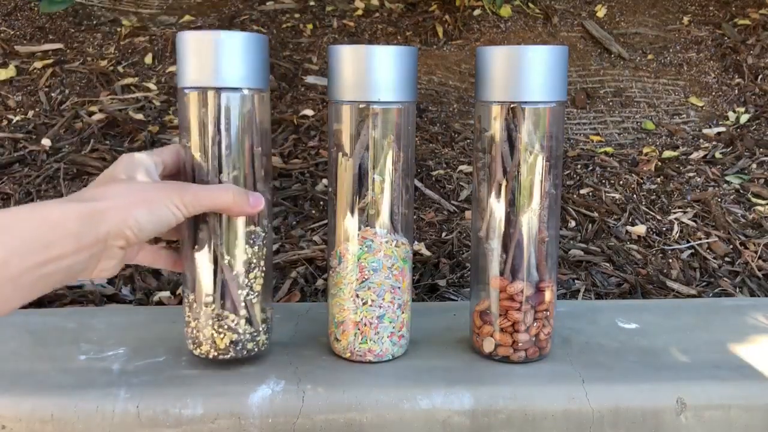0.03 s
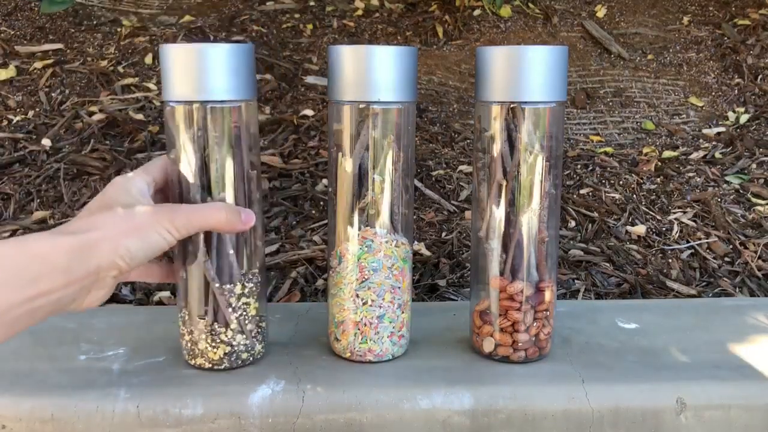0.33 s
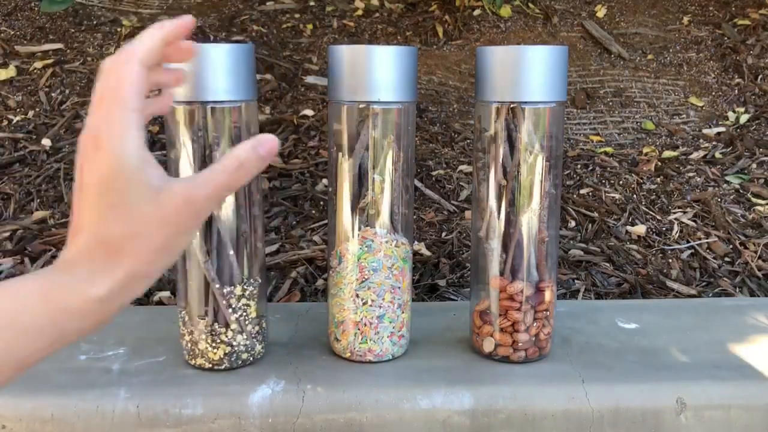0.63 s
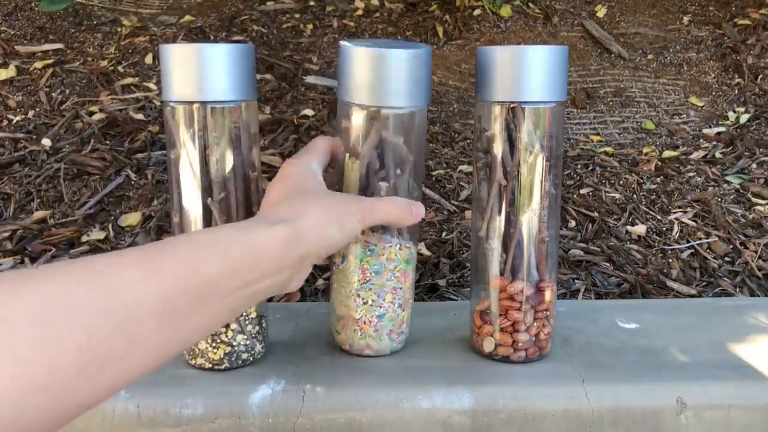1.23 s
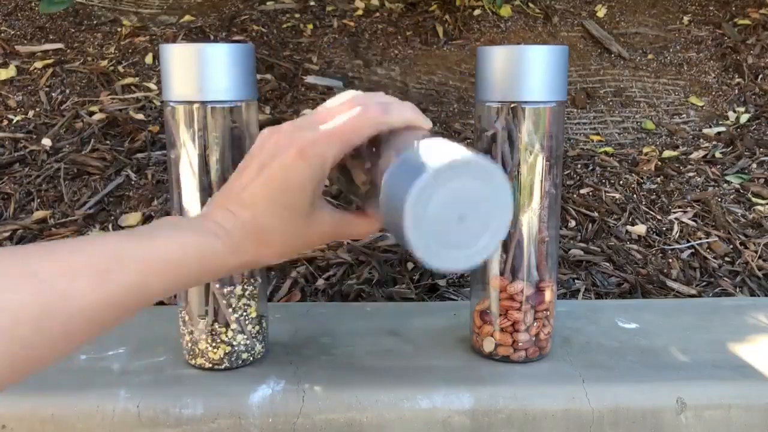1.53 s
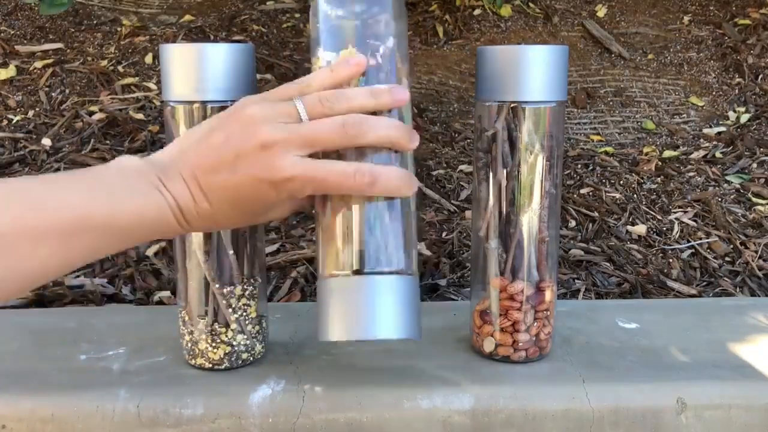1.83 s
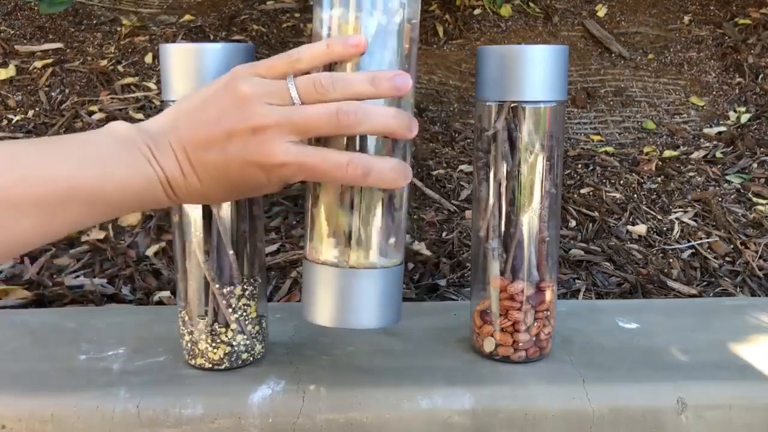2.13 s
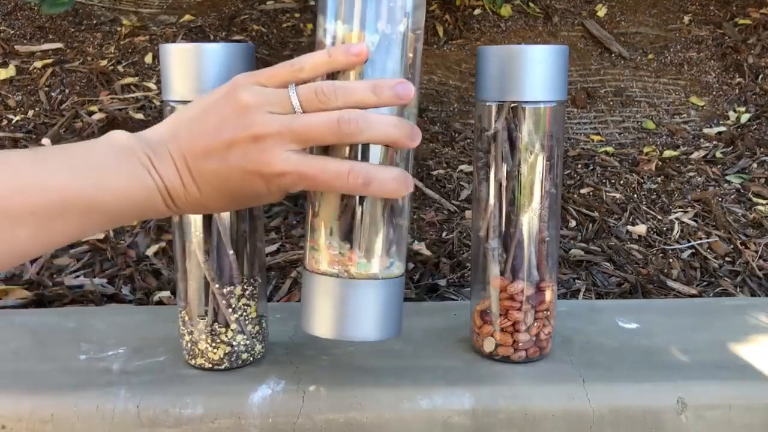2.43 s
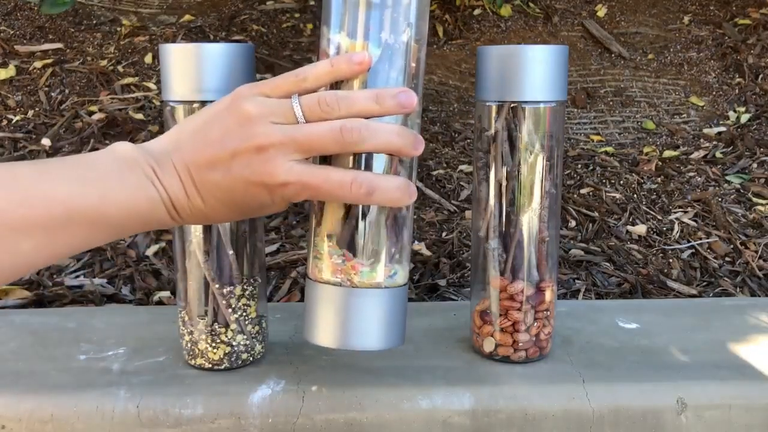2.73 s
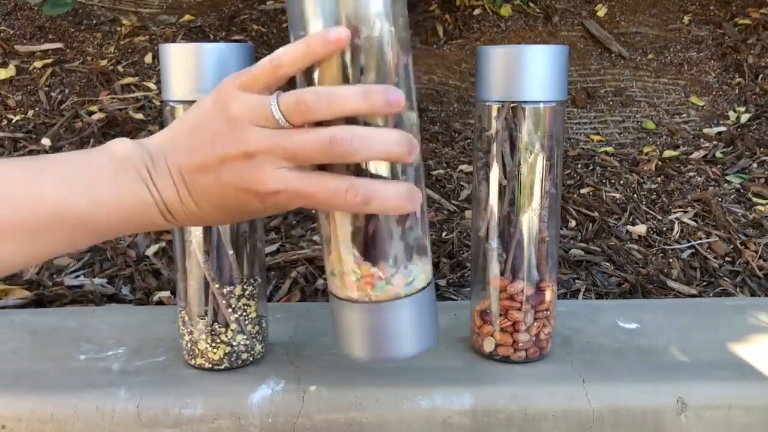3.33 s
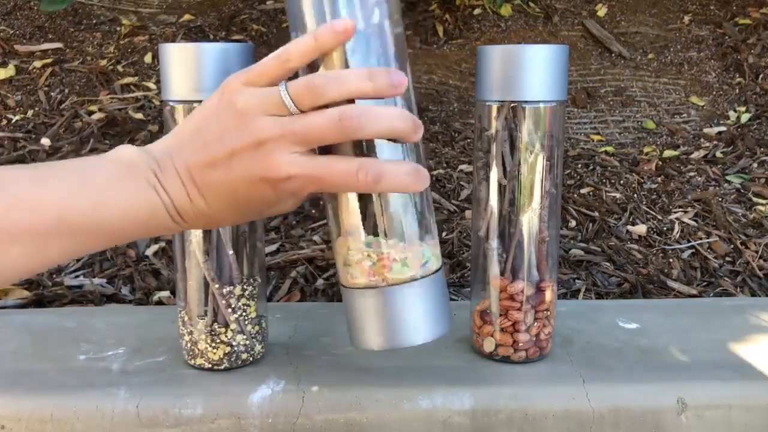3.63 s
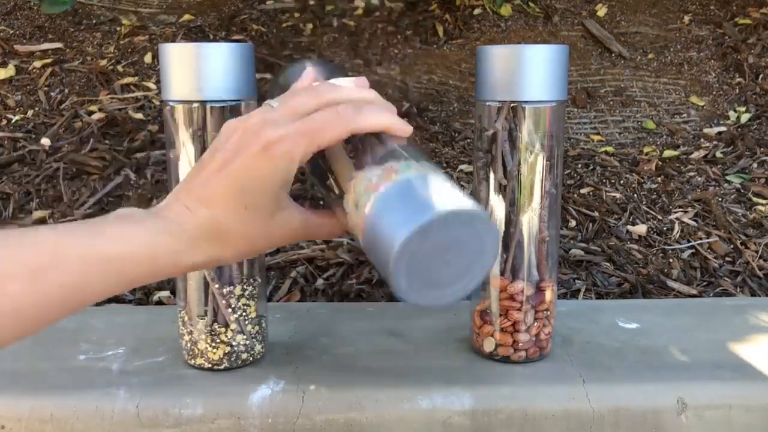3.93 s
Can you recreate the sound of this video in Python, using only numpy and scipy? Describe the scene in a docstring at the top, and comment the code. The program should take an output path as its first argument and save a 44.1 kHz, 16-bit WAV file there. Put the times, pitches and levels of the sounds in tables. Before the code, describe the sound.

Small grains pour and hiss like rain inside a plastic bottle being turned over.

```python
"""Seeds and grains in plastic bottles

Outdoors, a bottle of seeds is set on a bench: the knock excites its modes and the seeds settle.
A second bottle is picked up and turned over: hard grains slip in clumps, slide down the wall, pelt
the cap and trickle out; a tilt pours the rest. Each impact rings short, damped modes of the plastic.
Dull handling bumps and a light wind rumble lie underneath, with a faint far bird."""
import sys
import numpy as np
from scipy import signal
from scipy.io import wavfile

SR = 44100
rng = np.random.default_rng(int(sys.argv[2]) if len(sys.argv) > 2 else 0)


def dump_mix(stems):
    """Bounce the given channels to the path in sys.argv[1] as a 16-bit WAV at rate SR."""
    frames = np.atleast_2d(stems).T  # one column per channel
    limited = np.clip(frames, -1, 1)  # hard clip at full scale
    pcm = np.round(limited * 32767).astype(np.int16)
    wavfile.write(sys.argv[1], SR, pcm)


N = 176400
TIME = np.arange(N) / SR
CLUMP_GRAINS_PER_S = 8000

# spectra of seed impacts, hard hits on the wall and hits on the cap: frequency_hz, gain_db
SEED_SPECTRUM = [(1000, 5.5), (2000, -2.5), (2700, 3), (4000, 4.5), (7000, 5.5), (9200, 7), (11500, 0),
                 (15500, -7)]
HARD_HIT_SPECTRUM = [(1200, -28), (2500, -0.5), (4500, 5), (6500, 7), (8200, 9.5), (10300, 14), (12000, -3),
                     (15500, -3)]
CAP_SPECTRUM = [(1200, -33), (2600, -10.5), (4800, -39), (5700, -5), (6800, -1), (7500, -0.5), (8350, -2),
                (8900, -2), (11000, -6.5), (13200, -12), (15500, -4)]


def from_db(db):
    """Decibels to amplitude ratio."""
    return 10 ** (np.asarray(db) / 20)


def level(rows):
    """Amplitude envelope through (time_s, level_db) points, silent outside them."""
    return from_db(np.interp(TIME, *np.transpose(rows), left=-140, right=-140))


def gain_at(spectrum, hz):
    """Amplitude gain of a spectrum, interpolated in decibels over log frequency."""
    frequencies, db = np.transpose(spectrum)
    return from_db(np.interp(np.log(hz), np.log(frequencies), db))


def bursts(rows, attack_s):
    """Transient envelopes: a linear rise, then exponential decay."""
    out, age = np.zeros(N + SR), TIME[:SR // 4]
    for start_s, db, decay_s in rows:
        start = int(start_s * SR)
        rise = np.minimum(age / attack_s, 1)
        fall = np.exp(-np.clip(age - attack_s, 0, 20 * decay_s) / decay_s)
        out[start:start + len(age)] += from_db(db) * rise * fall
    return out[:N]


def ring(force, hz, t60_s):
    """Damped resonator: a unit impulse starts a sinusoid of amplitude about 1."""
    radius, angle = from_db(-60 / (t60_s * SR)), 2 * np.pi * hz / SR
    return signal.lfilter([.5, 0, -.5], [1, -2 * radius * np.cos(angle), radius ** 2], force + 1e-18)


def reverberation(sound, t60_s):
    """Diffuse reflections: convolution with decaying noise of unit energy."""
    age = TIME[:SR // 2]
    response = rng.standard_normal(len(age)) * from_db(-60 * age / t60_s)
    return signal.fftconvolve(sound, response / np.linalg.norm(response))[:N]


def shaped_noise(spectrum, envelope):
    """Spectral shaping: noise weighted in half-octave bands, its rms following the envelope."""
    edges_hz = 20 * 2 ** np.arange(0, 10.1, .5)
    white = rng.standard_normal((2, N)) * envelope + 1e-18
    out, power = 0, 0
    for k, (low, high) in enumerate(zip(edges_hz, edges_hz[1:])):
        gain = gain_at(spectrum, np.sqrt(low * high))
        band = signal.butter(2, [low, high], "band", fs=SR, output="sos")
        out = out + gain * signal.sosfilt(band, white[k % 2])
        power += gain ** 2 * (high - low) * 2 / SR
    return out / np.sqrt(power)


def impacts(envelope, per_s, spectrum, size_spread_db=2.5, t60_s=.008):
    """Shot noise: grains strike at random, each exciting the wall's modes with its own strengths."""
    chance = np.clip(per_s / SR, 1e-6, .9) * np.ones(N)
    sizes = rms_one(from_db(size_spread_db * np.minimum(rng.exponential(1, N), 4.5)))
    hits = np.flatnonzero((rng.random(N) < chance) & (envelope > 1e-6))
    force = (sizes * envelope / np.sqrt(chance))[hits]
    modes_hz = np.linspace(1000, 15800, 48)
    gains = gain_at(spectrum, modes_hz)
    couplings = rng.standard_normal((len(modes_hz), 4093))
    out, clicks = np.zeros((2, N))
    active = slice(hits[0], hits[-1] + SR // 20)
    for hz, gain, coupling in zip(modes_hz, gains / np.linalg.norm(gains), couplings):
        clicks[hits] = gain * force * coupling[hits % len(coupling)]
        out[active] += ring(clicks[active], hz, t60_s)
    return out * np.sqrt(4 * np.log(1000) / (t60_s * SR))  # rms follows the envelope


def rms_one(x):
    """Normalisation to unit rms."""
    return x / np.sqrt(np.mean(x ** 2) + 1e-20)


def stream(flow, spectrum):
    """Granular flow: the impact rate grows as a power of the flow's amplitude."""
    envelope = level(flow)
    per_s = 5000 * (envelope / from_db(-39)) ** .45
    return impacts(envelope, per_s, spectrum)


def wind():
    """Turbulence gives a slowly varying rumble over the steady noise of the open air."""
    # strength of the rumble: time_s, level_db
    gusts = [(0, -46), (.6, -48.5), (.95, -47.5), (1.35, -40), (1.48, -47.5), (2.1, -45), (2.35, -44.5),
             (2.75, -48.5), (3.3, -44.5), (4, -47)]
    # spectra of the rumble and the air: frequency_hz, gain_db
    rumble_spectrum = [(22, -30), (45, -3.5), (70, 2), (120, -0.5), (230, -6.5), (400, -21), (700, -49),
                       (1500, -65)]
    air_spectrum = [(100, 10.5), (400, -16.5), (650, -0.5), (900, -0.5), (1300, -9), (2000, -17.5),
                    (4000, -21.5), (6000, -28), (10000, -32.5), (15000, -40)]
    return shaped_noise(rumble_spectrum, level(gusts)) + shaped_noise(air_spectrum, from_db(-56.5))


def settling_seeds():
    """Random collisions rattle as the seeds shift in the first bottle."""
    # motion of the seeds: time_s, level_db
    shifting = [(0, -52), (.02, -54.5), (.09, -55.5), (.16, -67), (.285, -81), (.297, -47.5), (.35, -55),
                (.43, -56), (.47, -56.5), (.55, -56), (.66, -66), (.74, -63), (.8, -85)]
    return impacts(level(shifting), 1400, SEED_SPECTRUM)


def handling(end_hz=99, sink_s=.0043, attack_s=.0035, decay_s=.009):
    """Soft impacts thud with sinking pitch; friction of skin and bench adds bursts of noise."""
    # bumps of the hand: start_s, peak_db, start_hz
    bumps = [(.082, -32, 323), (.12, -32.5, 258), (0.188, -32, 340), (.202, -32.5, 380),
             (0.436, -38.5, 262), (0.66, -38, 343), (0.735, -38, 376), (1.095, -32, 503), (1.102, -33, 543),
             (1.118, -28.5, 380), (1.135, -32.5, 378), (1.189, -41, 590), (1.194, -31, 707),
             (1.24, -30.5, 600), (1.283, -34.5, 340), (1.3311, -20.5, 687), (1.37, -34.5, 520),
             (1.388, -30, 427), (1.4, -28.5, 500), (1.412, -31, 530), (1.422, -27, 480), (1.532, -31, 530),
             (1.553, -32.5, 690), (1.567, -33.5, 527), (1.754, -34.5, 530), (1.767, -27, 424),
             (1.803, -31, 338), (1.833, -25, 490), (1.865, -31, 294), (1.893, -25, 386), (1.906, -32, 258),
             (1.935, -30, 460), (1.952, -30, 484), (1.98, -33, 456), (1.992, -32, 320), (2.037, -25, 307),
             (2.14, -30.5, 510), (2.161, -25, 257), (2.188, -35, 320), (2.508, -28, 450),
             (2.611, -29.5, 520), (2.724, -29, 534), (2.735, -30, 262), (2.81, -37.5, 286),
             (2.885, -33.5, 218), (2.995, -37.5, 485), (3.111, -31, 220), (3.155, -28, 448),
             (3.198, -32, 395), (3.245, -43, 530), (3.35, -36, 463), (3.902, -35, 496), (3.953, -34, 480),
             (3.984, -32, 470)]
    # the base scuffs the bench as it lifts: start_s, level_db, decay_s
    scuffs = [(1.411, -51, 0.014), (1.438, -51, 0.011)]
    # friction spectra of skin and bench: frequency_hz, gain_db
    rub_spectrum = [(30, -17), (70, 12.5), (130, 1), (240, -4), (380, -13.5), (520, -13), (720, -39),
                    (1000, -33), (2500, -66)]
    scuff_spectrum = [(500, -6), (1100, 5.5), (2400, -9.5), (6000, -13.5), (14000, -37)]
    thuds, age = np.zeros(N + SR), TIME[:SR // 8]
    rise = np.sin(np.pi / 2 * np.minimum(age / attack_s, 1)) ** 2
    fall = np.exp(-np.maximum(age - attack_s, 0) / decay_s)
    for (start_s, db, start_hz), phase in zip(bumps, rng.random(len(bumps))):
        hz = end_hz + (start_hz - end_hz) * np.exp(-age / sink_s)
        tone = np.sin(2 * np.pi * (phase + np.cumsum(hz) / SR))
        start = int(start_s * SR)
        thuds[start:start + len(age)] += from_db(db) * rise * fall * tone
    rubs = [(start_s, db - 8.5, .0094) for start_s, db, _ in bumps]
    rubbing = shaped_noise(rub_spectrum, bursts(rubs, attack_s=.002))
    scuffing = shaped_noise(scuff_spectrum, bursts(scuffs, attack_s=.002))
    return thuds[:N] + rubbing + scuffing


def seed_jolt():
    """Inertia drives the seeds against the base as the bottle stops."""
    # the seeds strike together: start_s, level_db, decay_s
    jolt = [(.2922, -36, 0.00079)]
    return impacts(bursts(jolt, attack_s=.00029), 3 * CLUMP_GRAINS_PER_S, SEED_SPECTRUM)


def cavity(grains):
    """Cavity resonance lifts a few bands, and reflections linger inside the bottle."""
    # resonances of the bottle: centre_hz, width_hz, added_gain
    resonances = [(1340, 150, 0.48), (1660, 220, 0.36), (3320, 480, 0.5), (6640, 180, 0.092)]
    resonant = grains + sum(gain * signal.lfilter(*signal.iirpeak(hz, hz / width_hz, fs=SR), grains)
                            for hz, width_hz, gain in resonances)
    return resonant + from_db(-8.5) * reverberation(resonant, t60_s=.048)


def knock():
    """Contact pulses excite the bottle's modes; a softer contact carries less treble."""
    # the base meets the bench, edge first, and rocks: start_s, level_db, cutoff_hz
    contacts = [(.29299, -25, 9050), (.2937, -23, 2276), (.29458, -15, 1164), (.3036, -24, 674)]
    # modes of the bottle: pitch_hz, gain_db, t60_s
    modes = [(257, -22, .053), (389, -13, .046), (658, -15, .031), (770, -12, .036), (981, -10, .018),
             (1146, -10, .015), (1311, -9, .026), (1665, -11, .009), (2032, -10, .024), (2285, -5, .014),
             (2663, -13, .025), (3099, -7, .002), (3893, -14, .009), (6961, -8, .002)]
    force = np.zeros(N)
    for start_s, db, cutoff_hz in contacts:
        softness = np.exp(-2 * np.pi * cutoff_hz / SR)
        impulse = from_db(db) * signal.unit_impulse(N, int(start_s * SR))
        force += signal.lfilter([1 - softness], [1, -softness], impulse + 1e-18)
    body = sum(from_db(db) * ring(force, hz, t60_s) for hz, db, t60_s in modes)
    return body + from_db(-16.5) * reverberation(body, t60_s=.22)  # faint outdoor reflections


def clacks():
    """Free vibration: each loose piece in the first bottle rings briefly at its own pitch."""
    # strikes of the pieces: start_s, level_db, pitch_hz
    strikes = [(0.315, -41, 2680), (0.346, -43, 2350), (0.362, -45, 2700), (.365, -49, 1710),
               (.381, -44, 1380), (.64, -47, 2800)]
    return sum(ring(from_db(db) * signal.unit_impulse(N, int(start_s * SR)), hz, t60_s=.018)
               for start_s, db, hz in strikes)


def clumps():
    """Superposition: dozens of impacts within milliseconds merge into one crunch."""
    # clumps drop against the wall: start_s, level_db, decay_s
    drops = [(.445, -44.5, 0.0037), (.4623, -41.5, 0.0055), (.5337, -47.5, .003), (.568, -54, 0.0041),
             (.611, -46, 0.0023), (.6928, -62, 0.008), (.7467, -55, 0.0037), (.881, -65.5, .004),
             (1.5925, -37.5, 0.013), (1.6357, -46.5, .009), (1.718, -38, 0.0031), (1.8143, -35, 0.0031),
             (1.83, -31.5, 0.0019), (2.6101, -35, 0.0039), (2.8639, -39.5, 0.013), (2.9317, -33, 0.003),
             (2.967, -40, 0.0021), (3.0006, -39, 0.004), (3.047, -46, 0.0045), (3.1023, -29, 0.0023),
             (3.116, -42, .013), (3.1547, -44.5, 0.0046), (3.2301, -56, 0.013), (3.508, -25.5, 0.0023),
             (3.77, -33, 0.0033)]
    return impacts(bursts(drops, attack_s=.000083), CLUMP_GRAINS_PER_S, HARD_HIT_SPECTRUM)


def ticks(decay_s=.00055):
    """A brief contact has a broad spectrum: single hard hits crack across the treble."""
    # hits on the wall: start_s, level_db
    hits = [(0.514, -39), (1.496, -44), (1.5025, -37), (1.5424, -34), (1.5454, -24), (1.5468, -25),
            (1.5575, -35), (1.5599, -27), (1.5902, -29), (1.594, -22.5), (1.599, -26.5), (1.6045, -24),
            (1.7181, -26), (2.342, -28), (2.3792, -31), (2.5306, -39), (2.669, -25.5), (2.8174, -30),
            (2.9035, -47), (3.1544, -35.5), (3.166, -36), (3.179, -39.5), (3.2283, -50), (3.243, -43.5),
            (3.3255, -50)]
    envelope = bursts([(start_s, db, decay_s) for start_s, db in hits], attack_s=.00011)
    return shaped_noise(HARD_HIT_SPECTRUM, envelope)


def bird(blur_hz=110):
    """A far bird's gliding whistles, blurred by random amplitude modulation and reverberation."""
    # whistles: start_s, length_s, start_hz, end_hz, level_db
    whistles = [(0.87, .08, 3720, 4220, -70), (0.94, 0.07, 2280, 3210, -71), (1.08, .05, 5400, 4600, -76),
                (1.303, 0.13, 6240, 2980, -70.5)]
    lowpass = signal.butter(2, blur_hz, fs=SR, output="sos")
    blur = rms_one(signal.sosfilt(lowpass, rng.standard_normal(N)))
    song = np.zeros(N)
    for start_s, length_s, start_hz, end_hz, db in whistles:
        progress = np.clip((TIME - start_s) / length_s, 0, 1)
        hz = start_hz + (end_hz - start_hz) * progress
        song += from_db(db) * np.sin(np.pi * progress) * np.sin(2 * np.pi * np.cumsum(hz) / SR)
    distant = song * blur
    return distant + from_db(-4) * reverberation(distant, t60_s=.3)


def wall_pour():
    """Dense impacts fuse into a hiss as grains run down the wall."""
    # flow down the wall: time_s, level_db
    flow = [(1.3, -77.5), (1.48, -70), (1.535, -69.5), (1.63, -48), (1.68, -67), (1.76, -50), (1.8, -56),
            (1.9, -44.5), (1.98, -40.5), (2.1, -34.5), (2.32, -42.5), (2.55, -42), (2.78, -44), (2.95, -60),
            (3.05, -45), (3.095, -56), (3.13, -52), (3.19, -76), (3.3, -88), (3.37, -73), (3.43, -40),
            (3.51, -34), (3.66, -40), (3.73, -36), (3.81, -45.5), (3.9, -46), (4.0, -55.5)]
    # response of the wall: frequency_hz, gain_db
    spectrum = [(1200, -29.5), (2000, -13.5), (2700, -11.5), (3300, -9.5), (3800, -8.5), (4400, -6),
                (5200, -7.5), (6400, -1.5), (7000, -9), (8100, 0), (8650, -5), (9200, -2.5), (10000, -2.5),
                (11000, -12.5), (13000, -11), (15500, -21)]
    return stream(flow, spectrum)


def bulk_slide():
    """Collective motion: grains sliding as one mass sound lower in pitch."""
    # flow of the mass: time_s, level_db
    flow = [(1.8, -62), (1.93, -55), (1.98, -40), (2.1, -49), (2.3, -57), (2.9, -57), (3.3, -71),
            (3.43, -51), (3.57, -56), (3.8, -55), (4.0, -56.5)]
    # spectrum of the slide: frequency_hz, gain_db
    spectrum = [(950, -24), (1300, 1.5), (1600, 1), (2500, 5), (3400, -1.5), (4500, 3), (8000, -2),
                (15500, -29)]
    return stream(flow, spectrum)


def cap_pelting():
    """Impacts excite the bare cap and fade as a heap cushions it."""
    # flow onto the cap: time_s, level_db
    flow = [(1.97, -37), (2.03, -33), (2.095, -25.5), (2.16, -31.5), (2.25, -35.5), (2.36, -43.5),
            (2.6, -47.5)]
    # a last lump lands: start_s, level_db, decay_s
    lump = [(2.2215, -23.5, .004)]
    surge = impacts(bursts(lump, attack_s=.0016), 3 * CLUMP_GRAINS_PER_S, CAP_SPECTRUM)
    return stream(flow, CAP_SPECTRUM) + surge


def skating():
    """Glancing collisions: grains skating over the heap ring in one bright band."""
    # flow over the heap: time_s, level_db
    flow = [(2.15, -53), (2.35, -41.5), (2.53, -38.5), (2.62, -48), (2.76, -48), (2.88, -66), (2.98, -51.5),
            (3.12, -58), (3.2, -84), (3.4, -79), (3.5, -37.5), (3.64, -45), (3.74, -39), (3.85, -48),
            (4, -62)]
    # the bright band: frequency_hz, gain_db
    spectrum = [(1000, -50), (7500, -20), (9000, 2), (9900, 0), (11500, -17), (15500, -35)]
    return stream(flow, spectrum)


def trickle():
    """At a low impact rate, stray grains are heard as separate ticks."""
    # flow of stray grains: time_s, level_db
    flow = [(2.2, -52.5), (2.65, -46.5), (2.9, -50), (3.13, -49.5), (3.2, -92), (3.4, -64), (3.5, -49),
            (4, -57.5)]
    # spectrum of their impacts: frequency_hz, gain_db
    spectrum = [(1200, -22), (2500, -14), (3400, 6.5), (4500, -0.5), (5500, -8), (6400, 11.5), (7100, 5),
                (9500, 2.5), (12000, -6), (15500, 2)]
    return impacts(level(flow), 330, spectrum)


def scene():
    """The sources add linearly in one channel, the grains coloured by the bottle's cavity."""
    first_bottle = settling_seeds() + knock() + clacks()
    pouring = wall_pour() + bulk_slide() + cap_pelting() + skating() + trickle()
    grains = seed_jolt() + clumps() + ticks() + pouring
    return (first_bottle + cavity(grains) + handling() + wind() + bird())[None]


def record(dry):
    """Band limiting: the microphone loses the deepest bass, and the top is cut steeply."""
    highpass = signal.butter(4, 38, "high", fs=SR, output="sos")
    lowpass = signal.ellip(12, .2, 80, 15850, fs=SR, output="sos")
    return signal.sosfilt(lowpass, signal.sosfilt(highpass, dry))


dry = scene()
out = record(dry)
dump_mix(out)
```